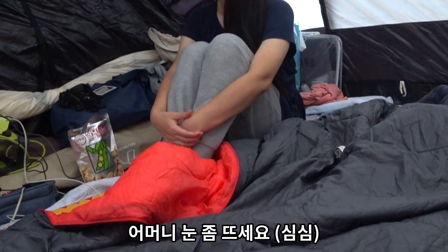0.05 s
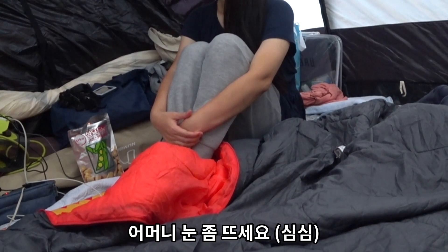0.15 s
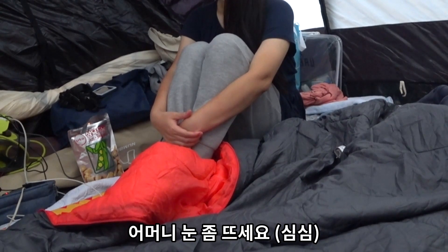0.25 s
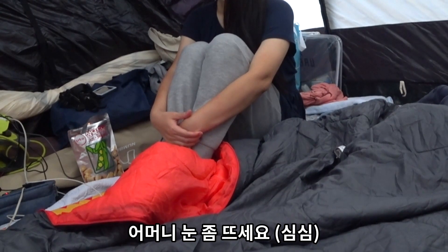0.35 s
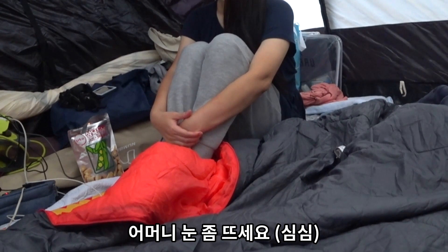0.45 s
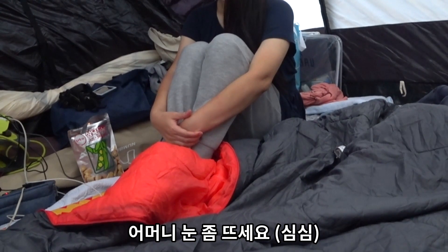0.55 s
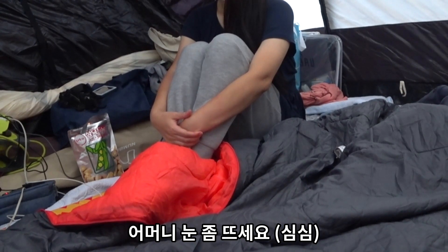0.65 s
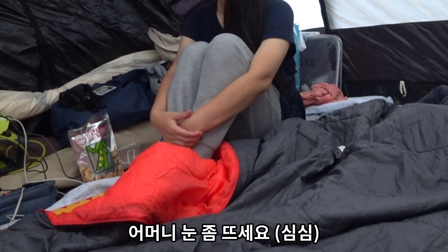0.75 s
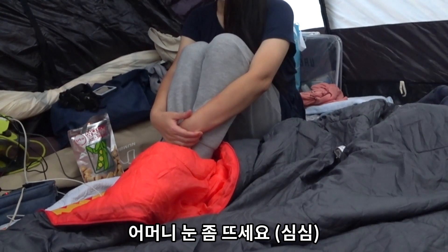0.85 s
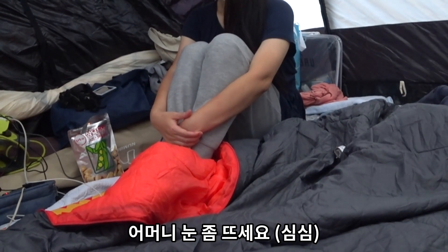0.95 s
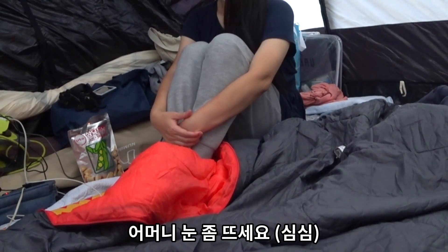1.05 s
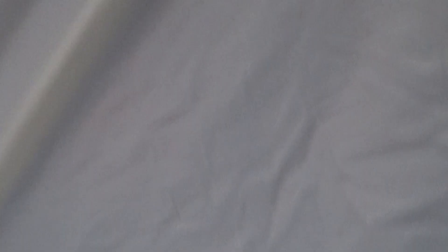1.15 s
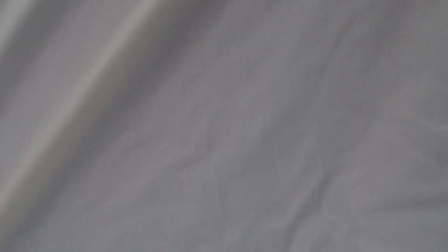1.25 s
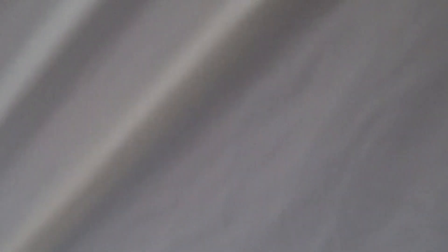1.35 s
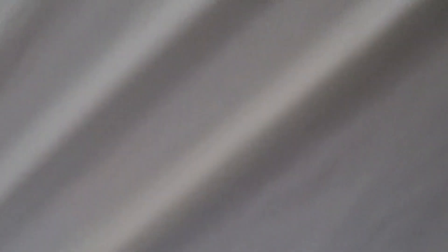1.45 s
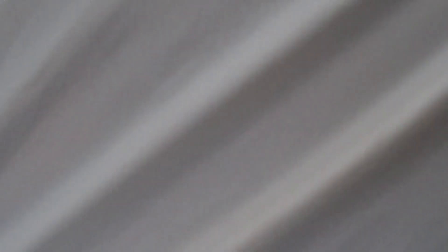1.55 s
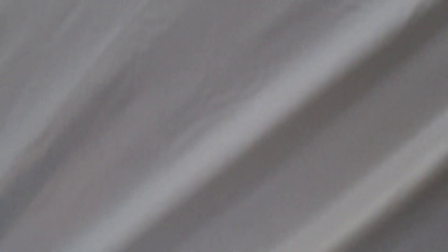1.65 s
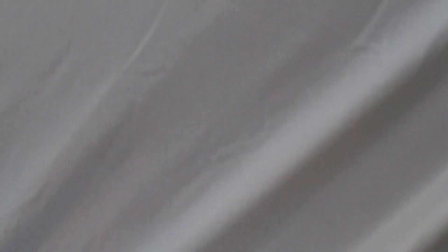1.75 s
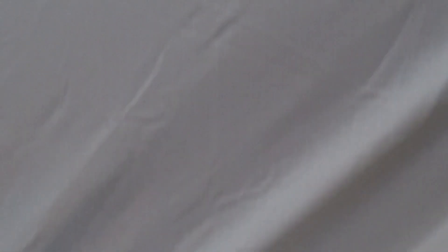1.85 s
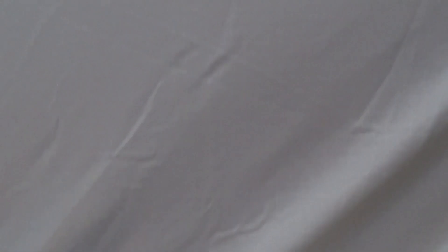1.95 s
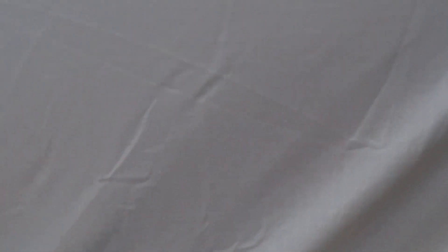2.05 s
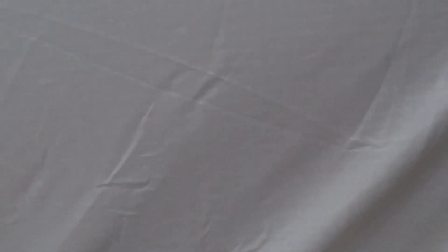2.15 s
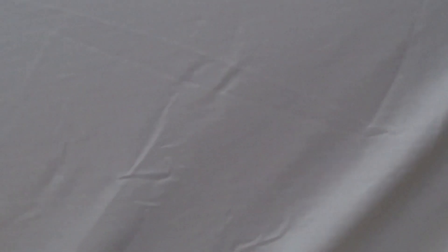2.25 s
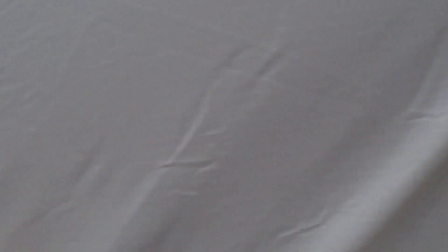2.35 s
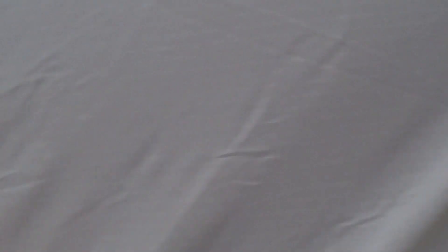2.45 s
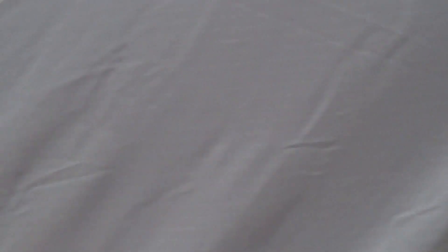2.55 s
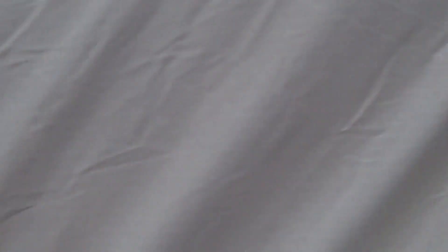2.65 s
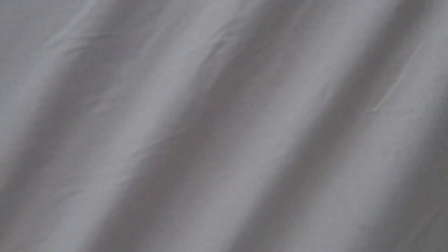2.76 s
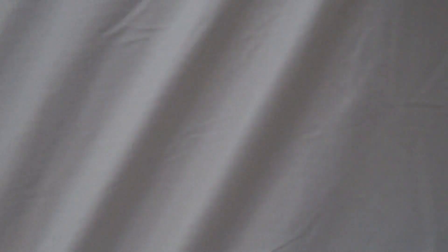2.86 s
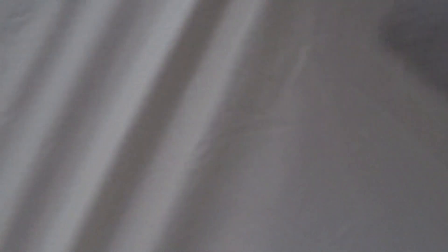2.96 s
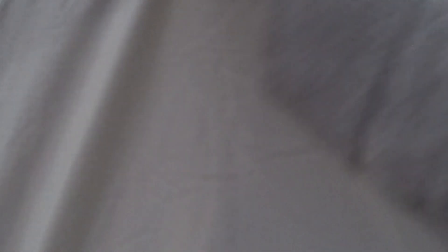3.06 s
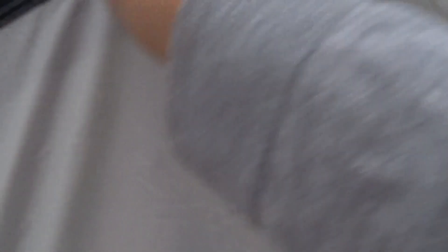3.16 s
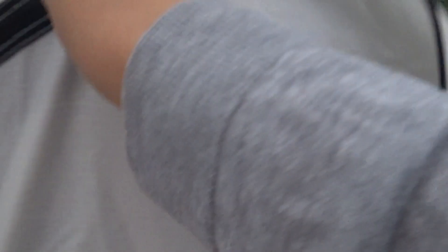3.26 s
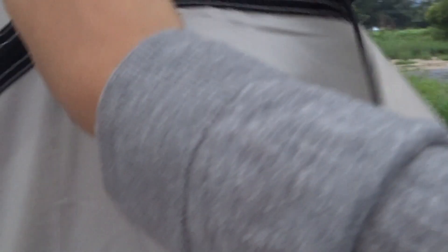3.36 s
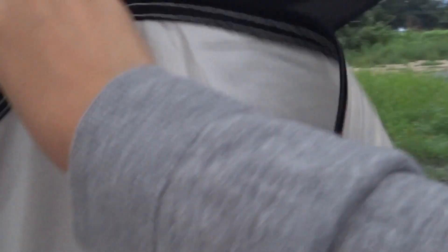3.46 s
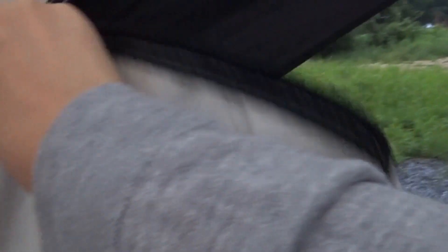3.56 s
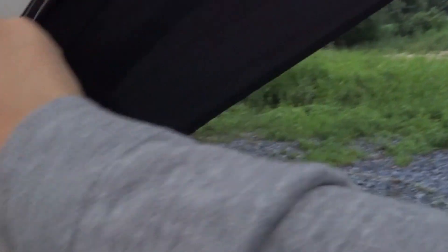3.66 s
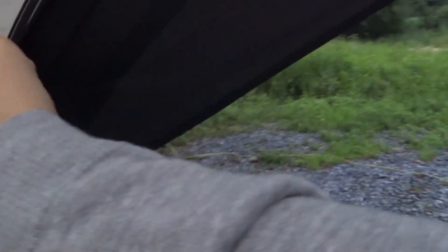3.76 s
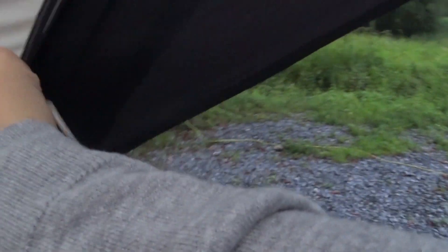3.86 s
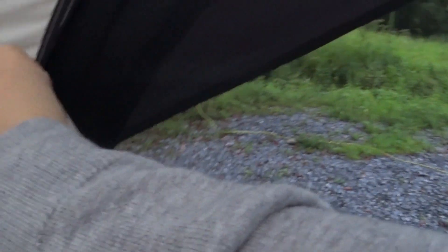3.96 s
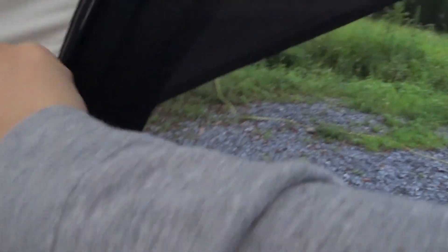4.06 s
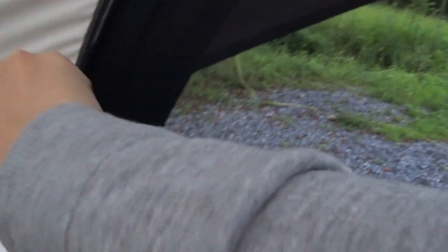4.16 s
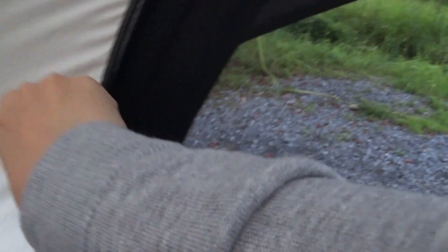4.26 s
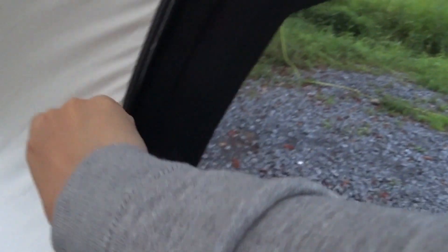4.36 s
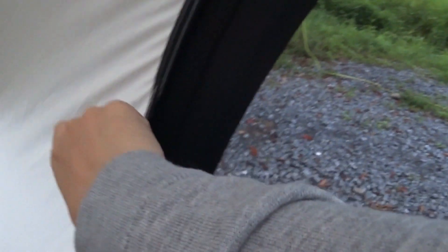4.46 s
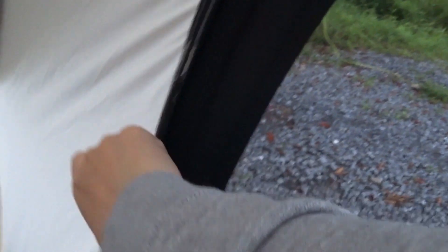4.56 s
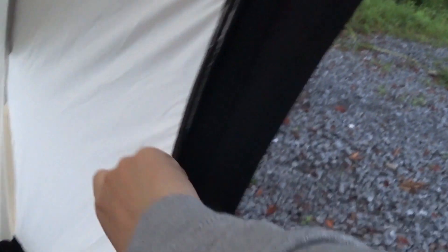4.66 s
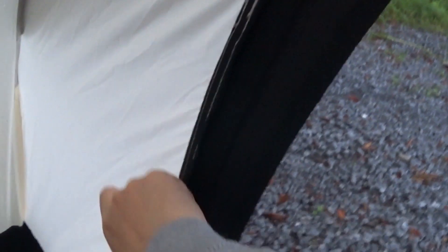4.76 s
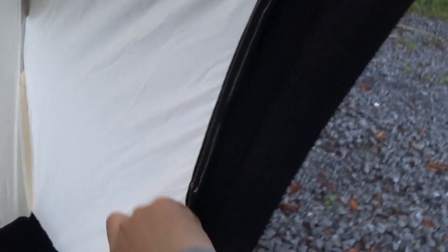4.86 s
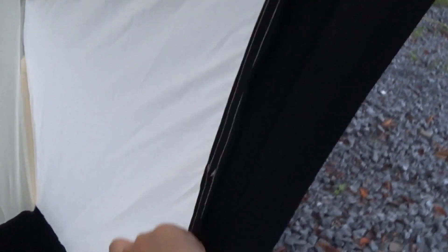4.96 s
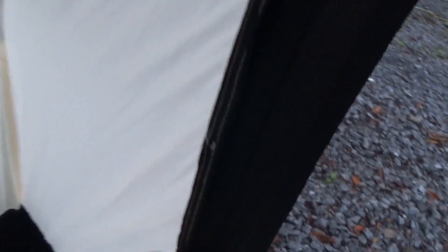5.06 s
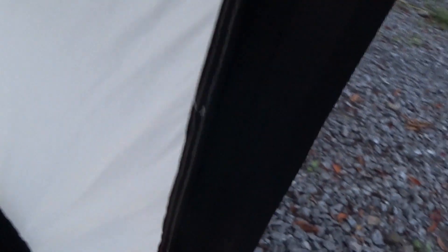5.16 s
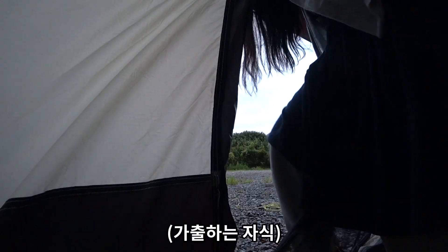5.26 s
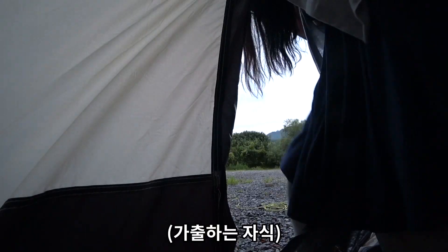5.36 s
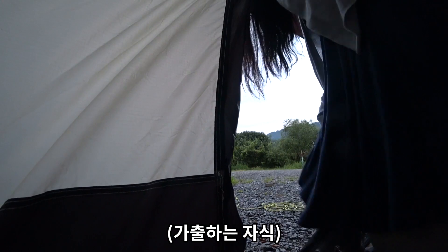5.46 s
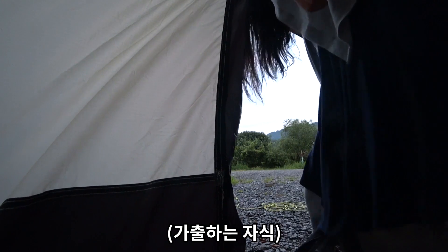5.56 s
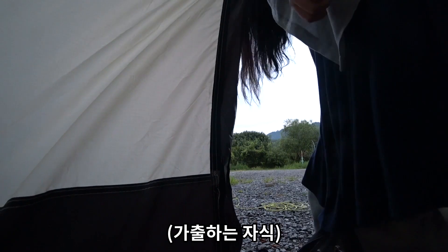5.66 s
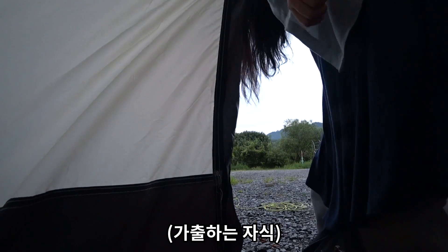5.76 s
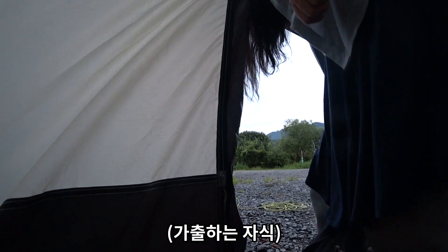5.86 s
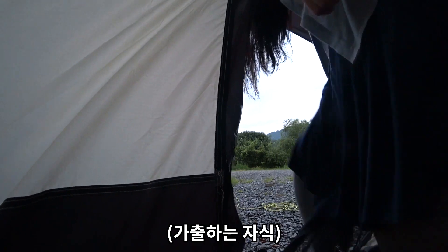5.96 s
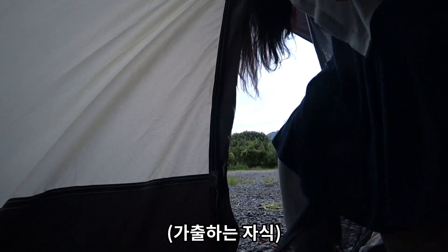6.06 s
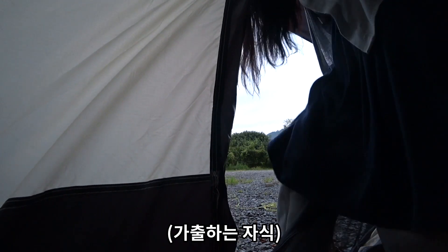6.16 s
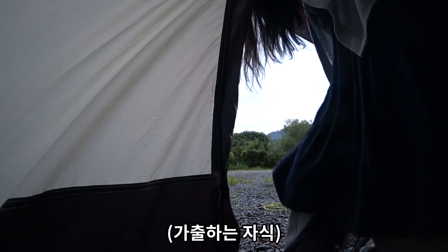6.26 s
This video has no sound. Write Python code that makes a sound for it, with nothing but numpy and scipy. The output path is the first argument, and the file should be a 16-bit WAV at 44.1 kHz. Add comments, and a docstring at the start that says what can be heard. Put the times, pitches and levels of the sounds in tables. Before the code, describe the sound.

A tent door zipper is pulled open in one long buzzing stroke, with nylon rustles and small taps before and after.

```python
"""A tent's door zipper, drawn open in one long stroke and heard from inside. Its teeth drum the taut
fabric into a buzz that follows the speed of the hand, while the slider scrapes along the tape.
First a hand brushes the nylon and the metal pull tab tinkles; afterwards cloth rustles and small
things tap. Outside, low wind, a distant hiss and a cricket carry on throughout."""
import sys
import numpy as np
from scipy import signal
from scipy.fft import rfft, irfft, next_fast_len
from scipy.io import wavfile
from scipy.ndimage import uniform_filter1d

SR = 44100
rng = np.random.default_rng(int(sys.argv[2]) if len(sys.argv) > 2 else 0)


def unload_audio(sound):
    """Save the sound as a 16-bit wav file, at the path given as the first command line argument."""
    columns = np.transpose(np.atleast_2d(sound))
    # keep every value between -1 and 1, then stretch to whole-number steps
    steps = np.round(np.clip(columns, -1, 1) * 32767)
    wavfile.write(sys.argv[1], SR, steps.astype(np.int16))


N = 277830
TIME = np.arange(N) / SR


def amp(db):
    return 10 ** (np.asarray(db) / 20)


def unit_rms(x):
    return x / np.sqrt(np.mean(x ** 2) + 1e-20)


def curve(points, t):
    return np.interp(t, *np.transpose(points))


def per_bin(points, size):
    """A frequency curve read at every FFT bin."""
    hz, value = np.transpose(points)
    return np.interp(np.log(np.fft.rfftfreq(size, 1 / SR) + 1), np.log(hz + 1), value)


def envelopes(rows):
    """Start sample and one envelope per column."""
    times, *columns = np.transpose(rows)
    t = np.arange(times[0], times[-1], 1 / SR)
    return round(times[0] * SR), [np.interp(t, times, c) for c in columns]


def add(mix, at, sound):
    part = mix[:, at:at + sound.shape[-1]]
    part += sound[..., :part.shape[1]]


def pan(db):
    """Channel gains; positive dB leans left."""
    return amp(np.outer([.5, -.5], db))


def coloured(x, spectrum):
    """EQ, then rms 1."""
    size = next_fast_len(x.shape[-1])
    return unit_rms(irfft(rfft(x, size) * amp(per_bin(spectrum, size)), size)[..., :x.shape[-1]])


def stereo(pair, correlation):
    """Two signals as mid and side, with a width set per frequency."""
    size = pair.shape[-1]
    same = np.clip(per_bin(correlation, size), -1, 1)
    mid, side = np.sqrt((1 + same) / 2) * rfft(pair[0]), np.sqrt((1 - same) / 2) * rfft(pair[1])
    return irfft(np.array([mid + side, mid - side]), size)


def drift(count, smooth_s):
    """Smooth random modulation of rms 1."""
    width = max(round(smooth_s * SR), 1)
    return unit_rms(uniform_filter1d(uniform_filter1d(rng.standard_normal(count), width), width))


def ring(x, hz, width_hz):
    """A resonance of gain 1 whose pitch can glide."""
    turn = np.exp(2j * np.pi * np.cumsum(hz * np.ones(x.shape[-1])) / SR)
    pole = np.exp(-np.pi * width_hz / SR)
    return 2 * (turn * signal.lfilter([1 - pole], [1, -pole], x / turn)).real


def whistles(rows, source, t):
    """Narrow bands of the source, each swelling and fading."""
    return sum(amp(db) * np.exp(-((t - s) / half) ** 2) * unit_rms(ring(ring(source, hz, 2 * w), hz, w))
               for s, half, hz, w, db in rows)


def fabric_smear(x, decay_s, wet):
    """The direct sound plus the dense modes of loose fabric, on two paths."""
    tail = rng.standard_normal((2, 2000)) * np.exp(-np.arange(2000) / SR / decay_s)
    tail *= wet / np.linalg.norm(tail, axis=1, keepdims=True)
    return x + signal.oaconvolve(x[None], tail, axes=1)[:, :len(x)]


# EQ of the hiss and of the wind (frequency [Hz], gain [dB])
HISS_EQ = [(65, -47), (110, 7.5), (189, -12.5), (210, -5.5), (287, -1.5), (525, -4), (1690, -6),
           (3080, -13), (4680, -13), (5090, -20), (6670, -11.5), (8930, -24.5), (16000, -26)]
WIND_EQ = [(11, -19), (18, 5), (50, 2), (63, 6), (87, -4), (151, -15), (200, -13), (260, -45), (440, -120)]
# Wind fader (time [s], level [dB]); the brief swell near 2.57 s is a hand bumping the wall
WIND_LEVEL = [(0, -52), (1.2, -56), (1.7, -54), (2.3, -53.5), (2.57, -46), (2.8, -54.5), (4.3, -48.5),
              (4.6, -54.5), (5.47, -52), (6.3, -53.5)]
# Stereo image outside (frequency [Hz], correlation [-1..1])
OUTDOOR_IMAGE = [(60, 1), (180, 0.65), (550, -0.32), (1650, -0.34), (4970, 0.55), (15000, 0.99)]
def outdoor_air():
    """Distant hiss, and wind rumbling on the walls in lumps; once, near 2.57 s, a hand bumps the wall."""
    hiss = coloured(rng.standard_normal((2, N)), HISS_EQ) * amp(-55.5)
    wind = coloured(rng.standard_normal((2, N)), WIND_EQ) * amp(.99 * drift(N, .032))
    gusts = amp(curve(WIND_LEVEL, TIME) - 2 * drift(N, .11))
    return stereo(hiss, OUTDOOR_IMAGE) + stereo(wind, OUTDOOR_IMAGE) * gusts * pan(2.1)


# Cricket fader (time [s], level [dB])
CRICKET_LEVEL = [(0, -65.5), (1.3, -65.5), (2.1, -66), (5.5, -67.5), (6.3, -67.5)]
def cricket(period_s=.268, first_s=.125, wing_hz=4720):
    """Wings ring in one narrow band, in evenly spaced chirps."""
    chirps = np.clip(.35 + .75 * np.cos(2 * np.pi * (TIME - first_s) / period_s), 0, 1)
    wings = ring(ring(rng.standard_normal((2, N)), wing_hz, 450), wing_hz, 450)
    return amp(curve(CRICKET_LEVEL, TIME)) * chirps * unit_rms(wings + .44 * wings[::-1])


# EQ of the bright swish and of the low flap (frequency [Hz], gain [dB])
SWISH_EQ = [(590, -50), (1000, -27), (1280, -6), (3670, 7.5), (4730, 3.5), (7530, 9), (9380, 0.5),
            (12100, 3), (16000, -15)]
FLAP_EQ = [(47, -33), (80, 2), (156, 1), (865, -3), (962, -3), (1590, -6.5), (3000, -14.5), (3900, -17.5),
           (6600, -120)]
# Stereo image of cloth and zipper (frequency [Hz], correlation [-1..1])
TENT_IMAGE = [(60, 0.89), (180, 0.96), (550, 0.97), (1650, 0.89), (4970, 0.82), (15000, 0.61)]
# Rustle cues (peak time [s], rise [s], fall [s], swish [dB], flap [dB], swish centre [Hz], pan [dB])
RUSTLE_CUES = [(1.37, 0.0093, 0.18, -50, -49, 6300, 2), (1.414, 0.059, 0.053, -41, -59, 6000, 1),
               (1.559, 0.037, 0.039, -57, -45, 4740, 1), (1.635, 0.066, .16, -53, -47, 4170, 1),
               (1.702, 0.065, 0.18, -69, -61, 3100, 9), (1.76, 0.032, 0.45, -57.5, -53, 4700, 1),
               (2.12, 0.17, 0.19, -53, -55.5, 5930, -2), (2.18, 0.016, 0.04, -47, -43, 3650, 2),
               (2.284, 0.052, 0.42, -60, -57, 6000, 1), (2.567, 0.0083, 0.052, -58, -46.5, 5570, -2),
               (5.485, 0.016, 0.2, -47.5, -45, 4500, 1.5), (5.605, 0.054, 0.086, -44, -45, 3200, -0.5),
               (5.705, 0.04, 0.097, -47, -41, 3100, 0.5), (5.839, 0.026, 0.012, -53, -49.5, 6200, 2),
               (6.092, 0.038, 0.45, -57.5, -54, 4870, 1)]
def rustle(peak, rise, fall, swish_db, flap_db, centre_hz, pan_db):
    """Clumped crackle of nylon over the low flap of the whole sheet."""
    at, (shape_db,) = envelopes([(peak - rise, -12), (peak, 0), (peak + fall, -12)])
    count, size = len(shape_db), SR // 2
    clumps = amp(2.5 * (drift(size, .0023) + .15 * drift(size, .0047)))
    swish, flap = clumps * rng.standard_normal((2, 2, size))
    swish = coloured(swish, SWISH_EQ)
    swish = unit_rms(swish + 1.7 * ring(swish, centre_hz, 2500))
    cloth = amp(swish_db) * swish + amp(flap_db) * coloured(flap, FLAP_EQ)
    shape = amp(shape_db) * signal.windows.tukey(count, .1)
    return at, stereo(cloth, TENT_IMAGE)[:, :count] * shape * pan(pan_db)


# Squeak cues (peak time [s], half length [s], pitch [Hz], bandwidth [Hz], level [dB])
SQUEAK_CUES = [(1.421, 0.01, 3540, 119.4, -50), (1.453, 0.028, 2470, 250, -55),
               (1.557, .03, 4700, 150, -55), (1.678, 0.092, 2900, 300, -58), (1.75, 0.049, 3220, 400, -59),
               (1.874, 0.011, 1280, 200, -53)]
def finger_squeaks():
    """Fingers rub short whistles of friction out of the nylon."""
    return whistles(SQUEAK_CUES, rng.standard_normal(N), TIME)


# The tab hits the slider (time [s], strength [dB])
TAB_HITS = [(1.5405, -47), (1.577, -39), (1.6232, -40), (1.6437, -37), (1.747, -41), (1.826, -43.5),
            (4.4375, -37), (4.733, -27), (4.764, -34), (4.927, -36), (5.0658, -27), (5.2554, -42),
            (5.305, -49), (5.815, -47), (5.874, -43)]
# The loose tab shivers (start [s], end [s], strength [dB], trim for modes under 10 kHz [dB])
TAB_SHIVERS = [(1.538, 1.603, -57.5, -3), (1.612, 1.674, -63, -8), (1.713, 1.77, -64, -7),
               (4.557, 4.784, -55, -0.5), (4.87, 4.956, -74, -8), (5.036, 5.1, -70, -4),
               (5.16, 5.33, -48.5, 2)]
# Modes of the metal (frequency [Hz], gain [dB], 60 dB decay [s])
TAB_MODES = [(4650, -9, .02), (8000, -15, .02), (8720, -15, .022), (10200, -22, .012), (11800, -9, .016),
             (12250, -12, .008), (13900, -20, .01), (15450, -12, .014)]
def pull_tab():
    """Single hits ring mainly the tab's upper modes under a bright tick; a fine shiver rings them all."""
    hits = np.zeros(N)
    for s, db in TAB_HITS:
        add(hits[None], round(s * SR), amp(db) * rng.standard_normal(200) * np.exp(-np.arange(200) / 230))
    ticks = unit_rms((rng.random(N) < 900 / SR) * amp(4 * rng.standard_normal(N)))
    ticks *= amp(3 * drift(N, .078))
    gates = sum(amp([[db], [db + trim]]) * (TIME > start) * (TIME < end)
                for start, end, db, trim in TAB_SHIVERS)
    high, low = ticks * uniform_filter1d(gates, 600)
    chime = 0
    for hz, db, t60 in TAB_MODES:
        drive = low + amp(-18) * hits if hz < 10000 else high + amp(-8.5) * hits
        damping = np.log(1000) / t60
        mode = ring(drive, hz, damping / np.pi) * SR / (2 * damping)
        chime += amp(db + 3.5 * drift(N, .017)) * mode
    tick = ring(hits + .3 * high, 10500, 6000)
    return fabric_smear(amp(-7.5) * chime + amp(-6) * tick, decay_s=.0045, wet=1.5) * pan(.33)


# Snaps and taps (time [s], crack [dB], crack pitch [Hz], thud [dB], thud pitch [Hz], pan [dB])
SNAP_CUES = [(1.540, -35, 9000, -44, 87, 0), (1.558, -48, 2000, -37.5, 204, 3),
             (1.5926, -28, 3050, -40, 1230, -7), (1.622, -27, 7500, -39, 1460, -8),
             (1.644, -32, 2890, -36, 1290, 3), (1.739, -37, 1790, -37, 260, 1),
             (1.763, -40, 1500, -39.5, 196, 2), (2.0647, -28.5, 4440, -32.5, 1650, -6),
             (2.106, -42, 6500, -39, 454, 3), (2.161, -21.5, 4800, -48, 610, -6),
             (2.1811, -20.5, 2480, -16, 1330, -5), (2.279, -24.5, 6560, -59, 618, -3),
             (2.308, -49, 3400, -63, 600, 0), (2.399, -37, 4200, -51, 151, 0),
             (2.4443, -35, 4200, -47, 600, -4), (2.5626, -26, 6900, -42, 655, -4),
             (2.587, -36, 2200, -43, 750, 5), (3.7365, -13.5, 4500, -30, 900, 4),
             (3.8098, -10.5, 4960, -32, 1260, 2), (3.8774, -22, 2490, -32, 740, 2),
             (3.94, -8, 6000, -20, 1260, 1), (4.075, -3, 3700, -26, 810, 4),
             (4.1189, -7, 4000, -39, 683, 6), (4.164, -13, 4370, -44, 662, 5),
             (4.1897, -3.5, 5000, -14, 2390, 2.5), (4.2197, -12.5, 3430, -24.5, 527, 4),
             (4.3136, -1, 5300, -42, 1430, 2), (4.3299, -8.5, 3580, -46, 563, 6),
             (4.4232, -13, 4200, -29, 830, 1), (4.486, -3, 3400, -31, 1330, 3),
             (4.5271, -11, 4060, -22, 1170, 3), (4.7647, -10.5, 4470, -34, 716, 0),
             (4.909, -16.5, 3430, -32, 696, 4), (5.036, -11.5, 6100, -37, 600, -2),
             (5.0605, -19, 2000, -20.5, 1250, 3), (5.1537, -14, 6100, -38, 700, -1),
             (5.4701, -32, 3880, -31.5, 576, 2), (5.483, -52, 1500, -34.5, 131, 2),
             (5.5075, -20.5, 4400, -34, 876, 2), (5.5619, -34, 2250, -28, 1010, 4),
             (5.573, -39, 2400, -33.5, 523, 2), (5.5866, -21.5, 2500, -37, 1040, 8),
             (5.593, -36, 2600, -26, 960, 1), (5.603, -15, 3370, -26, 1000, 6),
             (5.6154, -28, 4100, -30, 1040, 1), (5.638, -32, 2000, -38, 700, 2),
             (5.675, -26.5, 2780, -30, 1060, 4), (5.682, -36, 2500, -28.5, 1050, 0),
             (5.696, -22, 2900, -39, 517, 3), (5.7015, -22.5, 2190, -38, 600, 10),
             (5.718, -45, 2810, -24.5, 1110, 4), (5.7297, -38, 1500, -33, 480, 4),
             (5.7617, -26, 3020, -29, 940, 2), (5.8717, -18, 8400, -37, 1390, 1),
             (6.0909, -27.5, 4630, -36, 1080, 1), (6.225, -48, 3700, -37.5, 760, 6)]
def snap(s, crack_db, crack_hz, thud_db, thud_hz, pan_db):
    """A millisecond of strain, then a crack with a short tail off the tent walls, over a brief thud."""
    t = np.arange(1800) / SR - .0012
    after = np.maximum(t, 0)
    cycles = after * crack_hz
    click = np.sin(2 * np.pi * cycles) * np.exp(-cycles / .95) * np.minimum(cycles * 1.6, 1)
    noise = rng.standard_normal((2, 1800))
    burst = noise[0] * .095 * np.exp(-abs(t) / .0043)
    tail = noise * .059 * np.exp(-after / .014) * (t > 0)
    width = 1.03 * crack_hz
    crack = 1.22 * click + .8 * ring(ring(burst + tail, crack_hz, width), crack_hz, width)
    thud = -np.sin(2 * np.pi * thud_hz * after) * np.exp(-after * thud_hz / 1.5)
    return round(s * SR), (amp(crack_db) * crack + amp(thud_db) * thud) * pan(pan_db)


# Taut fabric under the teeth (frequency [Hz], gain [dB])
PANEL_EQ = [(100, -20), (300, -7), (650, -2), (900, 0), (1200, 1.5), (1450, 1), (1900, -3), (2400, -8),
            (3000, -14), (3700, -22), (7000, -32)]
# Slider and door ring up (peak time [s], half length [s], pitch [Hz], bandwidth [Hz], level re buzz [dB])
SQUEAL_CUES = [(2.805, 0.068, 1365, 150, -9), (2.88, .02, 1474, 60, 0), (2.947, 0.044, 3010, 79, -1.5),
               (2.957, 0.094, 6400, 1410, -6), (3.294, 0.026, 3250, 109, -1.5),
               (3.282, 0.046, 2850, 130, -4.5), (3.815, 0.0099, 1260, 150, -5),
               (3.82, 0.0089, 800, 120, -12), (3.847, 0.014, 1280, 150, -4.5), (3.861, 0.01, 236, 80, -0.5),
               (3.896, 0.016, 386, 90, -10), (3.911, 0.0082, 260, 90, 6), (3.938, .01, 940, 150, 4),
               (4.034, 0.017, 864, 140, 4), (4.083, 0.007, 1310, 150, 5), (4.148, .015, 885, 100, -2),
               (4.273, 0.016, 885, 89.5, 8), (4.34, 0.0059, 547, 100, 5), (4.369, 0.013, 834, 160, 8.5),
               (4.393, 0.016, 169, 70, 3), (4.49, 0.0052, 1290, 130, 4), (4.545, 0.04, 4690, 100, -4.5),
               (4.66, 0.028, 4620, 100, -4.5), (4.737, 0.017, 4700, 130, -7), (4.796, .02, 344, 90, -4),
               (5.2, 0.22, 640, 130, -4.5)]
def tooth_buzz(t, teeth, grip, uneven, hum_gain, buzz_gain):
    """Teeth drum the door: a hum at the tooth rate, buzzing overtones and brief squeals."""
    count = len(t)
    hum = grip * amp(2.5 * drift(count, .004)) * np.sqrt(2)
    hum *= np.cos(2 * np.pi * (teeth + .04 * drift(count, .003)))
    overtones = 0
    for k in range(2, 12):
        partial = np.cos(2 * np.pi * (k * teeth + rng.random() + .065 * drift(count, .004)))
        overtones += partial * amp(-4.5 * np.log2(k) + 3 * drift(count, .01))
    squeals = whistles(SQUEAL_CUES, overtones + 3.9 * rng.standard_normal(count), t)
    clarity = np.sqrt(1 - uneven)
    buzz = clarity * coloured(grip * overtones, PANEL_EQ) + squeals
    return fabric_smear(np.sqrt(clarity) * hum_gain * hum + buzz_gain * buzz, decay_s=.006, wet=.2)


# Low growl of the door (frequency [Hz], gain [dB])
GROWL_EQ = [(60, -15), (120, 1), (250, -0.5), (450, 3.5), (650, -10), (1000, -37)]
def door_shake(grip, uneven, hum_gain, buzz_gain):
    """An uneven pull shakes the door at random, into a growl and a rattle."""
    growl, rattle = np.sqrt(grip * uneven) * rng.standard_normal((2, 2, len(grip)))
    return .5 * hum_gain * coloured(growl, GROWL_EQ) + .4 * buzz_gain * coloured(rattle, PANEL_EQ)


# Slider on tape (frequency [Hz], gain [dB])
SCRAPE_EQ = [(100, -48), (600, 5), (1500, -3), (2300, -1), (3500, -1.5), (4670, -3.5), (6990, -4.5),
             (8500, -14), (10700, -16.5), (11900, -14.5), (13500, -24), (16000, -41)]
def slider_scrape(teeth, uneven, body_gain, fizz_gain, split_hz=8200, colour_hz=4530):
    """Each tooth releases a puff of friction noise; snagging teeth add sharp spikes."""
    count = len(teeth)
    puffs = (1 + np.exp(-(teeth % 1) / .23)) * amp(.23 * drift(count, .026) + 1.55 * drift(count, .029))
    snags = rng.random(count) < 160 * uneven / SR
    snags = snags * amp(3.2 * np.clip(rng.standard_normal(count), -2, 2))
    puffs += 2.03 * signal.lfilter([1], [1, -np.exp(-1 / (.00061 * SR))], snags)
    scrape = coloured(puffs * rng.standard_normal((2, count)), SCRAPE_EQ)
    body, fizz = (signal.sosfilt(signal.butter(4, split_hz, band, fs=SR, output="sos"), scrape)
                  for band in ("low", "high"))
    roaming_hz = colour_hz * np.exp(.21 * drift(count, .054))
    body = unit_rms(body + .82 * ring(body, roaming_hz, 810))
    fizz = unit_rms(amp(2.8 * drift(count, .019)) * fizz)
    return body_gain * body + fizz_gain * fizz


# Faders along the stroke (time [s], buzz [dB], scrape body [dB], scrape fizz [dB])
STROKE_LEVELS = [(2.66, -60, -61, -72), (2.71, -40.5, -48.5, -55), (2.75, -40.5, -41, -45),
                 (2.8, -32, -36, -39.5), (2.9, -36.5, -37.5, -43), (2.95, -33.5, -35, -40),
                 (3.0, -31, -31.5, -41), (3.19, -31.5, -39, -41.5), (3.3, -34, -35.5, -46.5),
                 (3.5, -38.5, -39, -50.5), (3.57, -31, -36, -43.5), (3.62, -34, -34.5, -47),
                 (3.67, -37, -36.5, -48), (3.76, -36.5, -37.5, -45), (3.81, -31, -34, -43),
                 (3.9, -32, -33.5, -44.5), (3.99, -39, -35, -47), (4.07, -37, -34, -38.5),
                 (4.22, -38, -36, -47), (4.34, -39.5, -37, -47.5), (4.45, -40.5, -37.5, -51),
                 (4.6, -40.5, -39, -51.5), (4.75, -41.5, -36.5, -43.5), (4.91, -42, -40, -48),
                 (5.07, -40.5, -39.5, -42), (5.255, -45.5, -35.5, -60.5), (5.366, -38, -41.5, -52)]
# Hum fader (time [s], level [dB])
HUM_LEVEL = [(2.66, -61), (2.7, -43), (2.74, -40.5), (2.9, -39.5), (2.91, -36), (3.0, -41.5), (3.01, -34),
             (3.16, -39), (3.17, -29.5), (3.26, -41.5), (3.3, -31), (3.31, -35), (3.38, -36), (3.41, -45.5),
             (3.53, -39.5), (3.56, -31), (3.62, -36), (3.73, -34), (3.75, -40.5), (3.77, -33.5),
             (3.86, -34), (3.9, -28.5), (3.93, -33), (3.96, -33.5), (4.06, -37.5), (4.23, -32.5),
             (4.3, -35.5), (4.32, -51), (4.37, -40), (4.49, -35.5), (4.5, -40.5), (4.56, -32.5),
             (4.6, -42.5), (4.63, -39), (4.67, -42), (5.01, -46.5), (5.04, -44.5), (5.17, -51),
             (5.31, -48.5), (5.37, -55)]
# Speed of the hand (time [s], tooth rate [Hz])
TOOTH_RATE = [(2.66, 180), (2.72, 212), (2.77, 310), (2.804, 442), (2.842, 458), (2.86, 487), (2.92, 498),
              (2.966, 610), (2.99, 585), (3.01, 598), (3.046, 535), (3.066, 530), (3.14, 440), (3.17, 495),
              (3.19, 490), (3.21, 452), (3.29, 435), (3.35, 375), (3.4, 355), (3.46, 308), (3.534, 338),
              (3.6, 390), (3.65, 398), (3.7, 378), (3.75, 398), (3.8, 365), (3.83, 414), (3.89, 378),
              (3.92, 305), (3.95, 225), (3.99, 290), (4.07, 248), (4.12, 310), (4.15, 225), (4.22, 275),
              (4.39, 225), (4.43, 365), (4.455, 375), (4.475, 265), (4.5, 260), (4.525, 305), (4.56, 245),
              (4.6, 212), (4.63, 255), (4.68, 340), (4.72, 240), (4.79, 330), (4.83, 205), (4.88, 265),
              (4.98, 265), (5.05, 200), (5.25, 300), (5.37, 300)]
# Roughness of the pull (time [s], unevenness [0..1])
UNEVENNESS = [(2.66, .2), (2.8, .08), (3.05, .1), (3.15, .2), (3.22, .07), (3.45, .14), (3.56, .07),
              (3.65, .15), (3.75, .1), (3.84, .4), (3.9, .3), (3.98, .2), (4.08, .6), (4.2, .1),
              (4.26, .15), (4.35, .7), (4.42, .14), (4.64, .16), (4.7, .35), (4.78, .45), (4.88, .3),
              (5.1, .7), (5.37, .8)]
# The slider crosses from right to left (time [s], pan [dB])
SLIDER_PATH = [(2.66, -2.5), (3.4, 0), (4.0, 1.5), (5.37, 1.5)]
def zipper():
    """One stroke: the slider grips and slips over the teeth, and an uneven hand blurs the pitch."""
    at, levels_db = envelopes(STROKE_LEVELS)
    buzz_gain, body_gain, fizz_gain = amp(levels_db)
    count = len(buzz_gain)
    t = (at + np.arange(count)) / SR
    uneven, hum_gain = curve(UNEVENNESS, t), amp(curve(HUM_LEVEL, t))
    wobble = .018 * drift(count, .005) + uneven * (.1 * drift(count, .002) + .24 * drift(count, .012))
    teeth = np.cumsum(curve(TOOTH_RATE, t) * np.exp(wobble)) / SR  # teeth passed so far
    slip_db = 1.3 + 4.5 * uneven
    grip = amp(slip_db * np.clip(drift(count, .014), -2, 2))
    grip /= np.exp((slip_db * np.log(10) / 20) ** 2)  # holds the mean power near 1
    stroke = tooth_buzz(t, teeth, grip, uneven, hum_gain, buzz_gain)
    stroke += door_shake(grip, uneven, hum_gain, buzz_gain)
    stroke += slider_scrape(teeth, uneven, body_gain, fizz_gain)
    return at, stereo(stroke, TENT_IMAGE) * pan(curve(SLIDER_PATH, t)) * signal.windows.tukey(count, .003)


def scene():
    """The close sounds of the tent over the outdoor bed."""
    mix = outdoor_air() + cricket() + pull_tab() + finger_squeaks()
    add(mix, *zipper())
    for cue in RUSTLE_CUES:
        add(mix, *rustle(*cue))
    for cue in SNAP_CUES:
        add(mix, *snap(*cue))
    return mix


def record(dry):
    """A steep high cut at 15.9 kHz."""
    return signal.oaconvolve(dry, signal.firwin(511, 15900, window=("kaiser", 9), fs=SR)[None], "same")


dry = scene()
out = record(dry)
unload_audio(out)
```